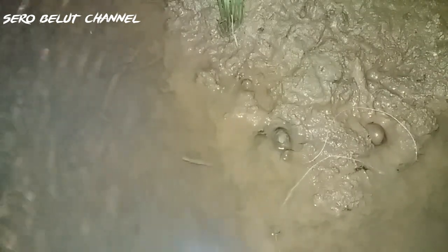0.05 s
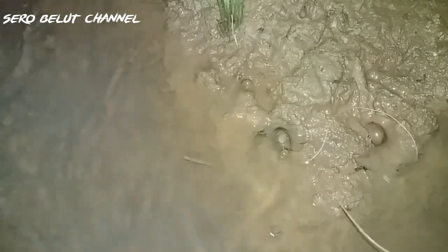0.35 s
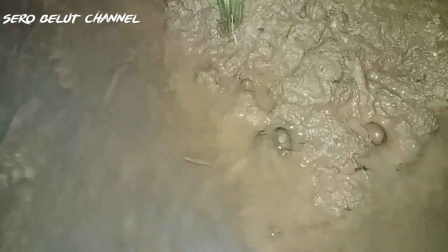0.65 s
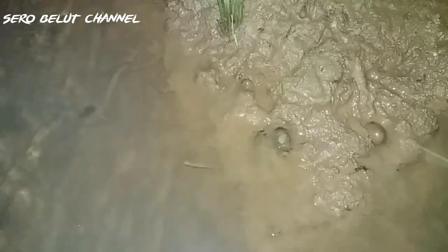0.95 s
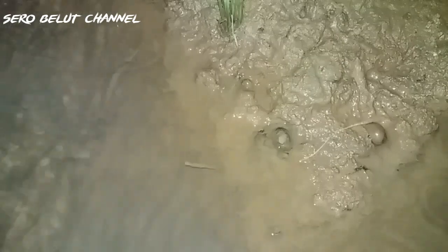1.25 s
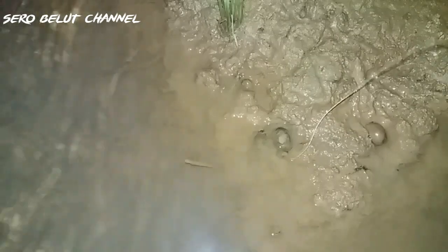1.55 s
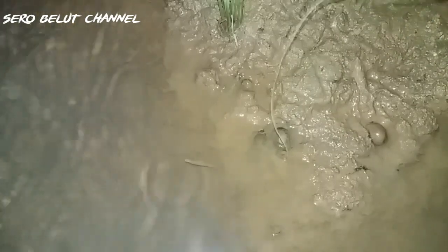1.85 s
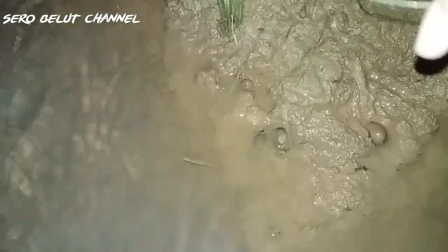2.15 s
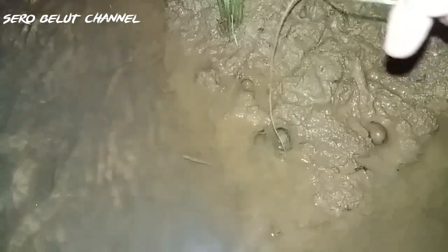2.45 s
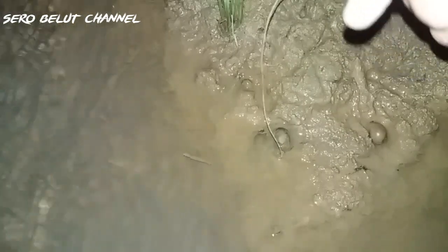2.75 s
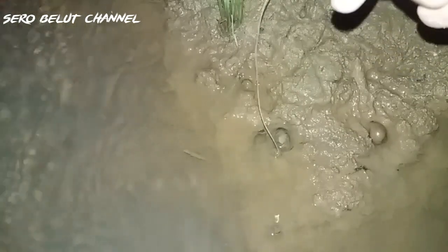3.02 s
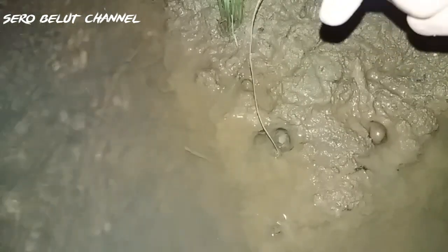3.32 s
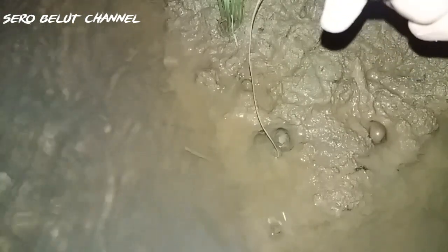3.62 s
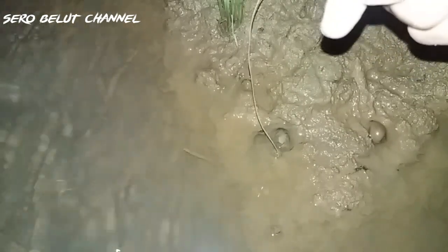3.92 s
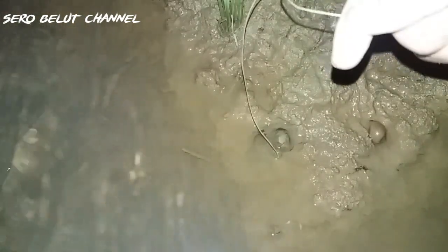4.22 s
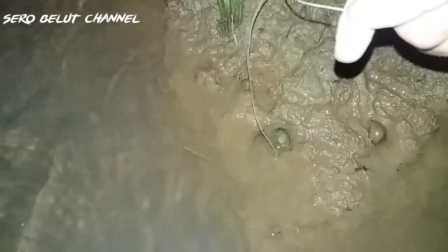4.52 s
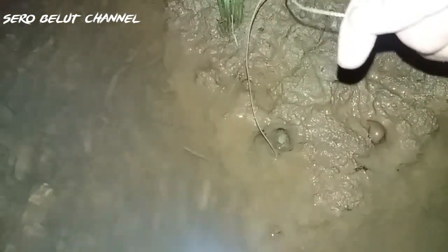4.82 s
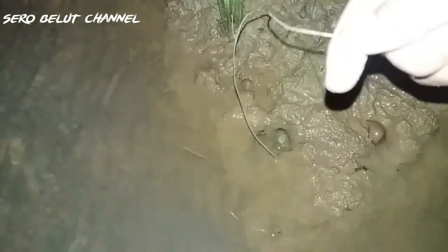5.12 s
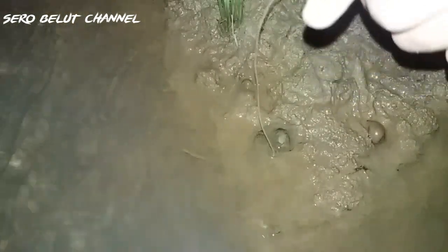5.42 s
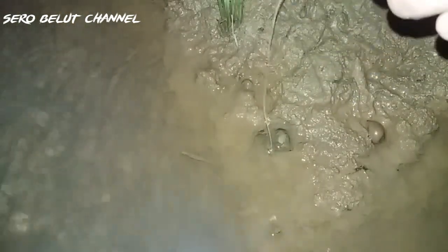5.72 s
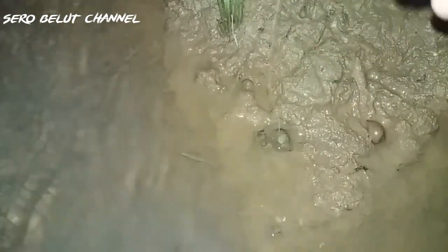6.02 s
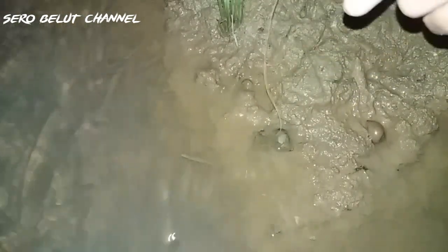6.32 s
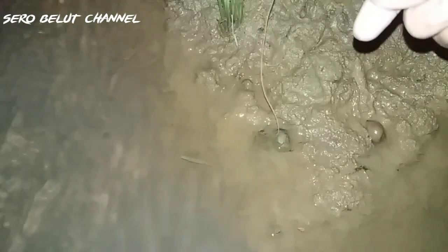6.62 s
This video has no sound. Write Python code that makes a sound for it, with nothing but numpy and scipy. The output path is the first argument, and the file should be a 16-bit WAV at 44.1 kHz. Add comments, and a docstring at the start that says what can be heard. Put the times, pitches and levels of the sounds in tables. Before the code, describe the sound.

Outdoors at night by shallow water, crickets keep up an unbroken high trill, one nearer and louder than the rest. Early on, fingers tap and rub a grass stem right by the microphone, building to a cluster of crisp clicks around two seconds, then easing to a few faint ticks. Soft insect buzzes, a thin rapid pulsing and occasional far frog peeps come through, with quiet regular cricket chirps toward the end.

```python
"""Night by a wet field

A mole cricket trills loudly over a chorus of farther crickets, all dragging a scraper over a wing file.
One cricket buzzes in bouts, a small bush cricket pulses high above, a far frog peeps now and then,
and a field cricket chirps near the end. Close to the microphone a hand shifts its grip on a grass stem:
skin and stem slip in a rustle, with soft taps, clicks and one short low thrum."""
import sys
import numpy as np
from scipy import signal
from scipy.fft import rfft, irfft
from scipy.io import wavfile
from scipy.ndimage import uniform_filter1d, map_coordinates

SR = 44100
rng = np.random.default_rng(int(sys.argv[2]) if len(sys.argv) > 2 else 0)


def to_wav(s):
    """Save 16-bit WAV."""
    ch = np.atleast_2d(s).T  # columns
    pcm = np.round(np.clip(ch, -1, 1) * 32767)  # PCM
    wavfile.write(sys.argv[1], SR, pcm.astype(np.int16))


N = 302967


def from_db(db):
    """Decibels to gain."""
    return 10 ** (np.asarray(db) / 20)


def unit_power(x):
    """Scale to an RMS of one."""
    return x / np.sqrt(np.mean(x ** 2) + 1e-20)


def clock():
    """Time of every sample in seconds."""
    return np.arange(N) / SR


def automation(rows):
    """Join (seconds, value) points into a curve with a value at every sample."""
    return np.interp(clock(), *np.transpose(rows))


def drift(per_s):
    """Smooth random wander of unit power, through per_s random points a second."""
    knots = rng.standard_normal(4096)
    return unit_power(map_coordinates(knots, [clock() * per_s], order=3, mode="wrap"))


def coloured(x, spectrum):
    """Shape a flat signal with an EQ curve of (Hz, dB) points; unit power."""
    hz, db = np.transpose(spectrum)
    bins = np.maximum(np.fft.rfftfreq(N, 1 / SR), 1)
    gain = from_db(np.interp(np.log(bins), np.log(hz), db, left=-90, right=-90))
    return unit_power(irfft(rfft(x) * gain, N))


def hump(u):
    """Smooth swell between u = 0 and u = 1."""
    return np.sin(np.pi * np.clip(u, 0, 1)) ** 2


def phase_of(hz):
    """Running phase of a moving pitch."""
    return 2 * np.pi * np.cumsum(hz) / SR


def wing_strokes(pitch_hz, per_s, fall, duty, uneven_db, jitter, stray, slip=1):
    """Each stroke drags a scraper over a file: a short tone that sags in pitch."""
    beat = np.cumsum(per_s * (1 + jitter * drift(25))) / SR + 1 + rng.random()
    stroke = beat.astype(int)
    progress = beat % 1 / np.clip(duty, .05, 1)
    size, jump, detune = rng.standard_normal((stroke.max() + 1, 3)).T
    hz = pitch_hz * (1 - fall * (progress - .5) + stray * detune[stroke])
    phase = phase_of(hz) + 2 * np.pi * slip * np.cumsum(jump)[stroke]   # slips between strokes
    return unit_power(hump(progress) * from_db(uneven_db * size[stroke]) * np.sin(phase))


def outdoors(x, wet_db, t60):
    """Direct sound plus scatter from banks and plants, at about the same power."""
    t = np.arange(SR // 2) / SR
    scatter = rng.standard_normal(len(t)) * from_db(-60 * t / t60) * (t > .002)
    wet = signal.fftconvolve(x, scatter / np.linalg.norm(scatter))[:N]
    return (x + from_db(wet_db) * wet) / np.sqrt(1 + from_db(wet_db) ** 2)


# The air's tone. Each row: frequency in Hz, EQ gain in dB.
AIR_EQ = [(25, -24), (45, -6), (70, -1), (115, 1.5), (250, -4.5), (450, -7.5), (750, -12.5), (1100, -14),
          (1500, -14.5), (2900, -12.5), (4000, -22), (6900, -25), (9500, -23), (15500, -25)]

def night_air():
    """A steady, dark bed of noise."""
    return from_db(-61.5) * coloured(rng.standard_normal(N), AIR_EQ)


# Fader ride of the near mole cricket. Each row: time in seconds, relative level in dB.
NEAR_TRILL_RIDE = [(0, -42.5), (.48, -42.5), (.58, -39.5), (1.1, -40.5), (1.45, -45), (1.9, -40),
                   (2.8, -44.5), (3.1, -42.5), (3.35, -45.3), (4.2, -44), (5.05, -44), (5.6, -45.5),
                   (6.5, -45.5), (6.87, -42)]
# Farther mole crickets. Each row: pitch in Hz, strokes per second, relative level in dB.
FAR_TRILLS = [(2183, 117.0, -51.5), (2264, 131, -56), (2025, 110, -56), (2437, 106, -59)]

def mole_crickets():
    """One near burrow with clear strokes; the farther ones blur into a band around it."""
    ride_db = automation(NEAR_TRILL_RIDE)
    near = wing_strokes(2240, per_s=123.4, fall=.02, duty=1, uneven_db=2, jitter=.003, stray=.005,
                        slip=.3)
    waver = from_db(.5 * drift(14))
    stumble = (1 - hump((clock() - 1.73) / .04 + .5)) ** 2   # drops a few strokes, once
    out = from_db(ride_db - 4.5) * outdoors(near * waver * stumble, wet_db=-9, t60=.083)
    far_ride_db = .13 * (ride_db + 45) - 2   # loosely follows the near one
    for hz, per_s, db in FAR_TRILLS:
        far = wing_strokes(hz, per_s, fall=.0458, duty=.98, uneven_db=.7, jitter=.03024, stray=.013)
        out += from_db(db + far_ride_db) * outdoors(far, wet_db=-3.5, t60=.25)
    return out


# Voices of the chorus. Each row: pitch in Hz, strokes per second, level within the chorus in dB.
CHORUS_VOICES = [(3324, 20, -9), (3376, 39, -8.5), (3357, 54, -10.5), (3515, 27, -9.5), (3463, 63, -6.5),
                 (3610, 59, -13), (3685, 29, -12)]
# Fader ride of the whole chorus. Each row: time in seconds, gain in dB.
CHORUS_RIDE = [(0, -57), (.6, -56.5), (1.2, -59.5), (2.6, -60), (3.3, -62.8), (4, -61), (5.4, -62.5),
               (6.15, -65), (6.55, -61)]

def cricket_chorus():
    """Slow, loose trills overlap at middle distance."""
    trills = np.zeros(N)
    for hz, per_s, db in CHORUS_VOICES:
        trill = wing_strokes(hz, per_s, fall=.06, duty=.64, uneven_db=2.5, jitter=.15, stray=.017)
        trills += from_db(db) * outdoors(trill, wet_db=-7.5, t60=.32)
    return from_db(automation(CHORUS_RIDE)) * trills


# The blur of far insects. Each row: frequency in Hz, EQ gain in dB.
INSECT_HISS_EQ = [(4100, -36), (4350, -10), (4850, -9), (5250, -18), (5530, 0), (5750, -3.5), (6080, 1),
                  (6260, -2.5), (6450, -29), (7550, -26), (8000, -12), (8500, -8), (9200, -36)]

def distant_insects():
    """Countless far insects merge into a hiss that slowly fades."""
    level_db = -64.5 - .38 * clock()
    return from_db(level_db) * coloured(rng.standard_normal(N), INSECT_HISS_EQ)


# Bouts of buzzing. Each row: middle of the first buzz in seconds, end in seconds, level in dB.
BUZZ_BOUTS = [(0.238, .65, -66), (2.49, 2.62, -63.5), (3.33, 3.73, -73.5), (5.885, 6.82, -68)]

def buzzing_cricket():
    """Short soft buzzes of wing strokes, about four a second, in bouts."""
    period_s, buzz_s = .27, .12
    gate = np.zeros(N)
    for first, end, db in BUZZ_BOUTS:
        for middle in np.arange(first, end, period_s):
            gate += from_db(db) * np.sqrt(hump((clock() - middle) / buzz_s + .5))
    strokes = wing_strokes(5170, per_s=108, fall=.15, duty=.34, uneven_db=0, jitter=.0066, stray=.008)
    return outdoors(gate * strokes, wet_db=-7, t60=.092)


# Taps of hand on stem. Each row: time in seconds, relative level in dB, pitch in Hz.
TAPS = [(.277, -43, 527), (0.551, -39, 600), (.582, -34.5, 533), (.647, -38, 191), (.649, -38, 636),
        (1.556, -38, 477), (2.13, -34.5, 244)]

def taps():
    """Soft contacts that swell and die within a few cycles."""
    out = np.zeros(N)
    for s, db, hz in TAPS:
        cycles = np.clip((clock() - s) * hz + .4, 0, 30)
        envelope = (1 - np.exp(-cycles / .36)) * np.exp(-cycles / .6)
        out += from_db(db + 5) * envelope * np.sin(2 * np.pi * cycles)
    return out


def grains(per_s, spread_db):
    """Tiny slips at random moments with widely varying sizes."""
    sizes = from_db(spread_db * np.minimum(rng.exponential(1, N), 3)) * rng.choice([-1, 1], N)
    return sizes * (rng.random(N) < per_s / SR)


# How hard the grip rubs. Each row: time in seconds, level of the dull rub in dB.
GRIP_RIDE = [(0, -86), (.45, -61), (.75, -58), (1.12, -60.5), (1.32, -53.5), (1.5, -55.5), (1.64, -51),
             (1.73, -57.5), (1.92, -49.5), (2.04, -49.5), (2.36, -63.5), (2.55, -60), (2.75, -68.5),
             (3, -63.5), (3.4, -70.5), (5.3, -75), (5.6, -66), (6.1, -77)]
FIRM_GRIP_DB = -50   # the rub's level at a firm grip
# The dull rub and the crisp scrape. Each row: frequency in Hz, EQ gain in dB.
RUB_EQ = [(65, -39), (110, -5), (167, 2), (231, 1), (301, -1.5), (452, -5.5), (685, -5), (1140, 0),
          (1300, -3.5), (1580, -6), (1750, 1), (2280, -23), (3850, -120)]
SCRAPE_EQ = [(1500, -47), (2000, 1), (2900, 5), (3400, 0.5), (4100, 2), (5500, 0.5), (7300, -5.5),
             (10000, -12), (15500, -21)]

def rustle():
    """Skin and stem slip in clumps: dull rubbing, and crisp crackles that grow as the grip tightens."""
    rub_db = automation(GRIP_RIDE)
    scrape_db = -50.5 + 1.28 * (rub_db - FIRM_GRIP_DB)
    clumps = from_db(1.88 * drift(70))
    slips = unit_power(grains(per_s=3500, spread_db=3.5) * clumps)
    crackles = unit_power(grains(per_s=500, spread_db=2.5) * clumps)
    rub = coloured(slips + .51 * crackles, RUB_EQ)
    scrape = coloured(.71 * slips + crackles, SCRAPE_EQ)
    return from_db(rub_db) * rub + from_db(scrape_db) * scrape


# The frog's calls. Each row: middle in seconds, top pitch in Hz, level in dB.
PEEPS = [(.66, 1100, -56.5), (3.106, 1093, -55.5), (4.282, 1097, -57), (4.92, 1100, -65)]

def frog():
    """Far peeps, each arching up in pitch and dropping at the end."""
    peep_s, out = .085, np.zeros(N)
    for middle, top_hz, db in PEEPS:
        u = (clock() - middle) / peep_s
        on = abs(u) < .5
        hz = top_hz * (1 - .916 * (u[on] - .07) ** 2)
        out[on] += from_db(db) * hump(u[on] + .5) * np.sin(phase_of(hz))
    return outdoors(out, wet_db=-6, t60=.24)


def bush_cricket():
    """About six chirps a second, slowing; each is a run of sharp strokes that swells and stops dead."""
    t, gate = clock(), np.zeros(N)
    chirp_s, full_voice_s, slowing_s = .13, 1.76, .00057
    end, period = 1.111, .153   # of the first chirp, in seconds
    while end - chirp_s < t[-1]:
        start, since_full = end - chirp_s, end - full_voice_s
        warm_up_db = 30 * min(since_full, 0)
        ease_off_db = 5.5 * (1 - np.exp(-max(since_full, 0) / 1.6))
        swell = np.clip(.42 + (t - start) / .067, 0, 1)
        gate += from_db(-58.5 + warm_up_db - ease_off_db) * swell * ((t > start) & (t < end))
        end, period = end + period, period + slowing_s
    strokes = wing_strokes(8373, per_s=112.4, fall=.15, duty=.6, uneven_db=1.5, jitter=.02, stray=.00609)
    return outdoors(strokes * uniform_filter1d(gate, size=130), wet_db=-8.5, t60=.17)


def chance_clicks():
    """Cues for lesser clicks, more frequent and stronger under a firmer grip; rows as in MAIN_CLICKS."""
    per_s, snap_db, knock_db = 20, -40.5, -42.5   # at a firm grip
    grip_db = automation(GRIP_RIDE) - FIRM_GRIP_DB
    at = np.flatnonzero(rng.random(N) < per_s * from_db(grip_db) / SR)
    force_db = .9 * grip_db[at, None] + 1.5 * rng.standard_normal((len(at), 2))
    return list(zip(at / SR, snap_db + force_db[:, 0], knock_db + force_db[:, 1]))


# Main clicks of grip and stem. Each row: time in seconds, bright snap and dull knock in relative dB.
MAIN_CLICKS = [(1.299, -35.5, -47), (1.3628, -32, -42), (1.435, -30, -44), (1.58, -33, -45),
               (1.6612, -30, -47.5), (1.873, -36, -39), (1.946, -28.5, -32.5), (2.0133, -27.5, -36),
               (2.0341, -30.5, -31), (2.0695, -34.5, -41), (2.0933, -33.5, -31.5), (2.1261, -31.5, -36),
               (2.197, -37, -35.5), (2.35, -31, -57), (2.3942, -44.5, -34.5), (2.568, -42, -49.5),
               (2.928, -47, -49), (3.448, -42, -59), (4.206, -43, -52)]
# What the clicks ring with. Each row: pitch in Hz, relative level in dB, seconds to fall 60 dB.
CLICK_MODES = [(237, -14, 0.072), (410, -6.5, 0.016), (978, -9, 0.029), (1230, -2, 0.016), (1550, 0, 0.011),
               (1870, 3.5, 0.0032), (3250, -3.5, 0.01), (4050, -2.5, 0.007), (4900, -1.5, 0.0054),
               (6350, -6.5, 0.0056), (6970, -6, 0.0025), (10000, -11, 0.0026)]

def clicks():
    """A snap with a brief crumbling tail strikes the modes; dull knocks favour the low ones."""
    t, out = np.arange(SR // 20) / SR, np.zeros(N + SR)
    for s, snap_db, knock_db in MAIN_CLICKS + chance_clicks():
        contact = .13 * rng.standard_normal(len(t)) * np.exp(-t / .0025)
        contact[0] = 1
        crack = from_db(snap_db - 14) * rng.standard_normal(len(t)) * np.exp(-t / .00052)
        ring = np.zeros(len(t))
        for hz, db, t60 in CLICK_MODES:
            force_db = np.interp(hz, [1800, 3200], [knock_db, snap_db - 5.5]) + rng.normal(0, 1.5)
            envelope = from_db(force_db + db - 60 * t / t60)
            ring += rng.choice([-1, 1]) * envelope * np.sin(2 * np.pi * hz * t)
        at = round((s + .001012) * SR)
        out[at:at + len(t)] += signal.fftconvolve(contact, crack + ring)[:len(t)]
    low_cut = signal.butter(2, 130, "high", fs=SR, output="sos")   # the clicks carry little bass
    return signal.sosfilt(low_cut, out[:N] + 1e-18)


def thrum():
    """A brief low tone that sags and quickly loses its overtones."""
    start_s, attack_s, hold_s = 1.799, .006, .046
    pitch_hz, sag_hz_per_s, fall_db_per_s = 123, 310, 420
    age = np.clip(clock() - start_s, 0, .5)
    phase = phase_of(pitch_hz - sag_hz_per_s * age)
    attack = np.minimum(age / attack_s, 1)
    level_db = -39.5 - fall_db_per_s * np.maximum(age - hold_s, 0)
    overtones = sum(np.cos(k * phase) * from_db(1 - 11 * (k - 2)) for k in range(2, 6))
    return attack * from_db(level_db) * (np.sin(phase) + np.exp(-age / .017) * overtones)


# The field cricket's chirps. Each row: middle of the last syllable in seconds, level in dB.
FIELD_CHIRPS = [(4.618, -66), (4.855, -63), (5.09, -63.5), (5.323, -63.5), (5.553, -64), (5.823, -63),
                (6.091, -63.5)]
# Trim of each syllable in dB, from the last back to the first.
SYLLABLE_TRIMS = [-1, -1.5, -2.5, -8]

def field_cricket():
    """Chirps of four syllables, each falling in pitch; the last is the loudest."""
    spacing_s, syllable_s = .036, .026
    t, out = clock(), np.zeros(N)
    for last, db in FIELD_CHIRPS:
        for k, trim_db in enumerate(SYLLABLE_TRIMS):
            u = (t - last + k * spacing_s) / syllable_s
            on = abs(u) < .5
            hz = 4680 * (1 - .244 * u[on] - .14 * u[on] ** 2)   # the wing slows as it closes
            out[on] += from_db(db + trim_db) * np.sqrt(hump(u[on] + .5)) * np.sin(phase_of(hz))
    return outdoors(out, wet_db=-7, t60=.2)


def scene():
    """Still air, insects and frog out in the field, and the hand close by, in mono."""
    bed = night_air() + mole_crickets() + cricket_chorus() + distant_insects()
    calls = bush_cricket() + buzzing_cricket() + field_cricket() + frog()
    hand = rustle() + clicks() + taps() + thrum()
    return (bed + calls + hand)[None]


def record(dry):
    """A small microphone loses the deep bass; the top is cut steeply."""
    low_cut = signal.butter(4, 50, "high", fs=SR, output="sos")
    high_cut = signal.ellip(12, .1, 80, 15750, fs=SR, output="sos")
    return signal.sosfilt(high_cut, signal.sosfilt(low_cut, dry))


dry = scene()
out = record(dry)
to_wav(out)
```